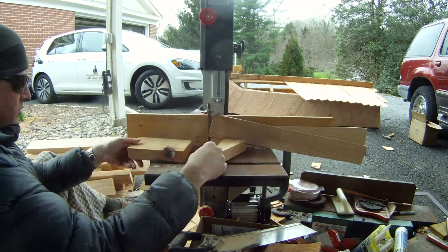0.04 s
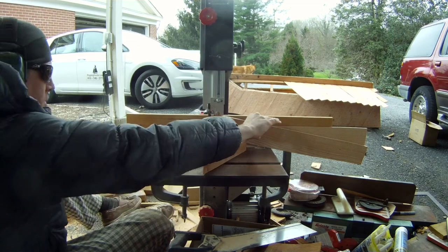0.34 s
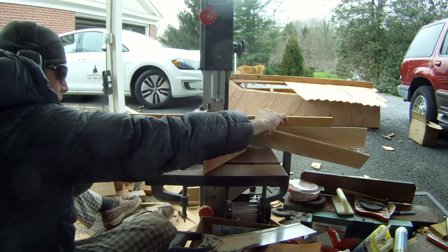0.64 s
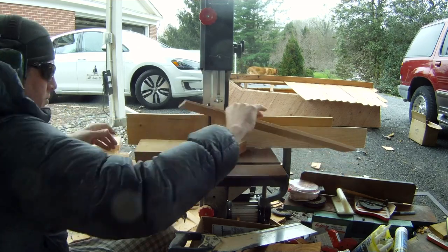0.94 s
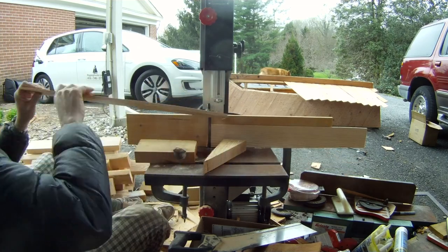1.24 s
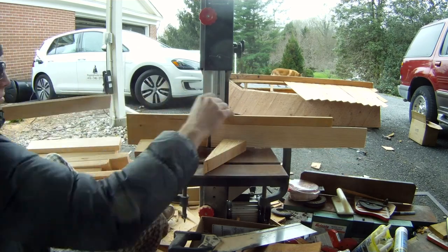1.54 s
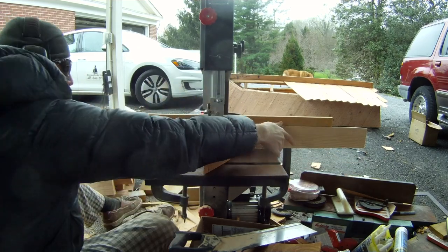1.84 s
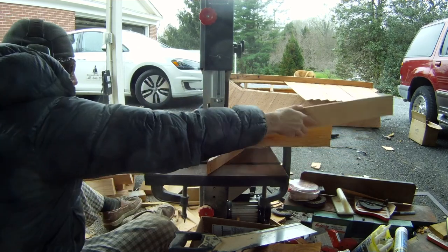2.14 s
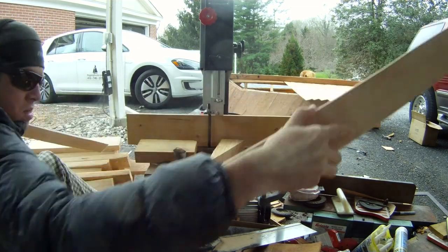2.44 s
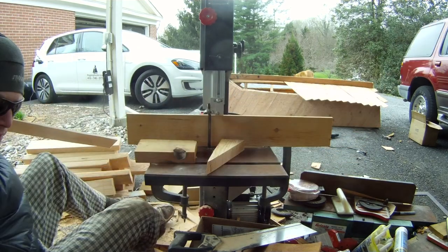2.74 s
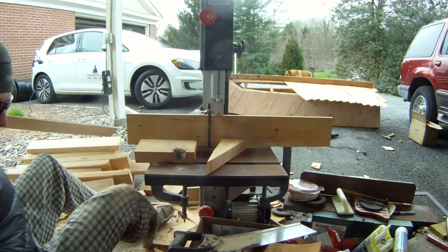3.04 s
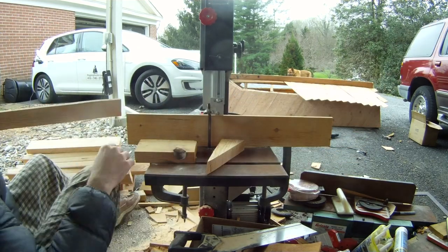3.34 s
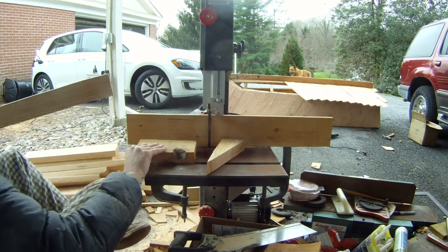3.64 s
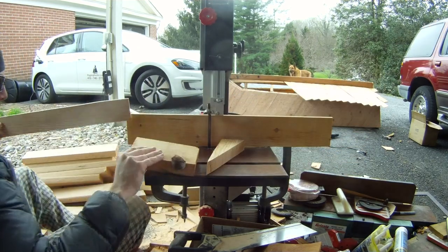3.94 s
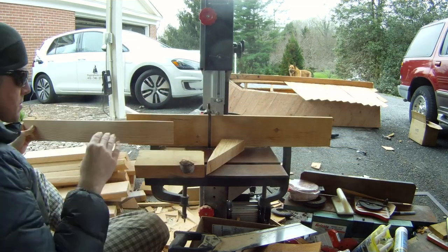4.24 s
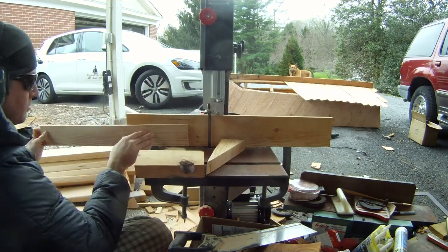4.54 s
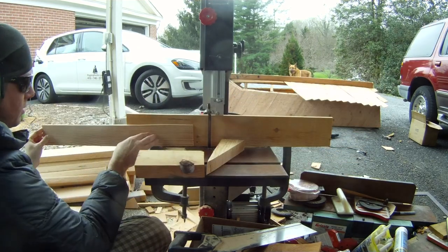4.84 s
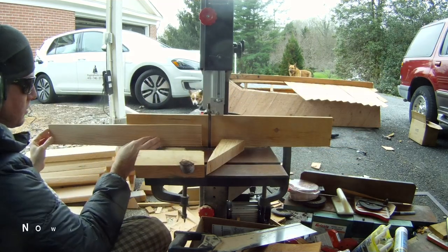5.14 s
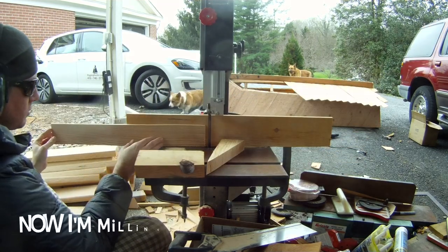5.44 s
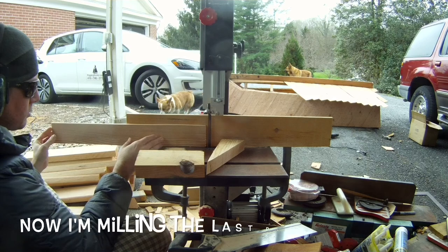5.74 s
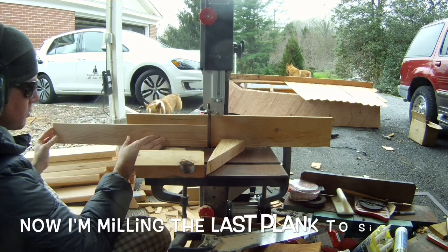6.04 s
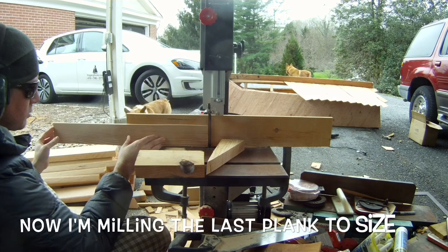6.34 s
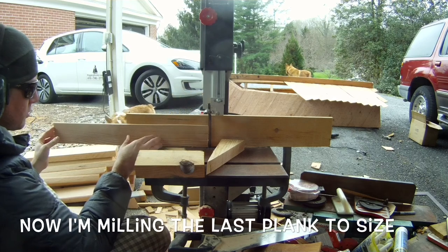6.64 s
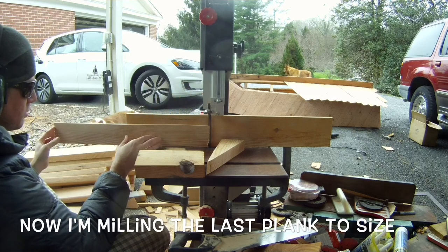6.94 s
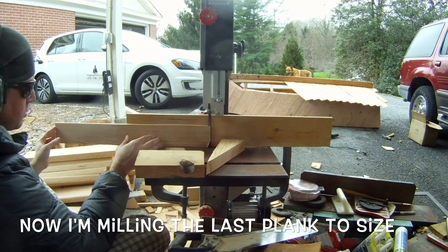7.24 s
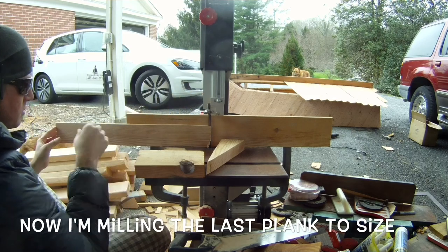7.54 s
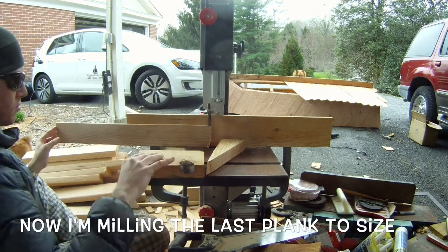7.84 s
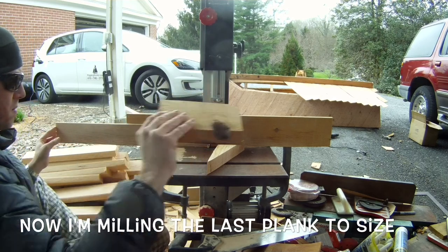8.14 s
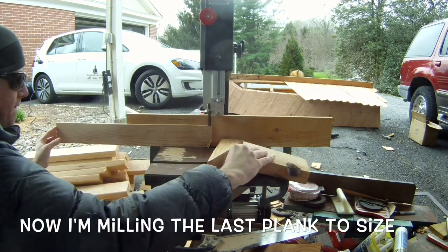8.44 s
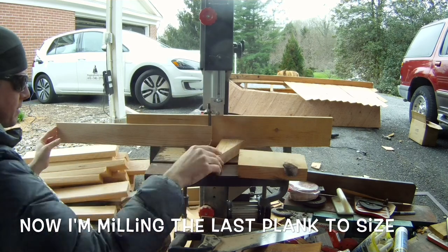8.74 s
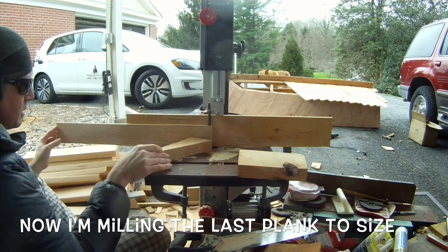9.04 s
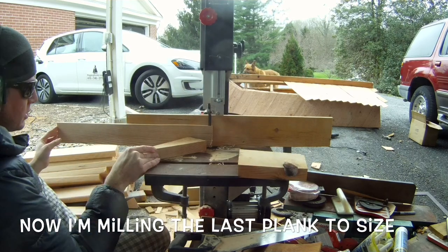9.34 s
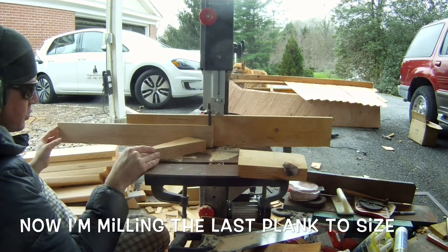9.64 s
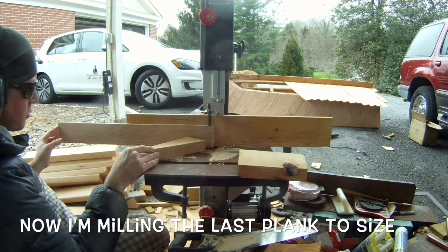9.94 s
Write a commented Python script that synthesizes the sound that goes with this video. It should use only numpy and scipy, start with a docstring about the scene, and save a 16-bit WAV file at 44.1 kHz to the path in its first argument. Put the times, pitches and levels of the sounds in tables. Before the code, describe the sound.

A bandsaw is already cutting a thin wooden plank, close by and outdoors, with a high, fluttering whine over a grainy sawdust hiss. At about 2.4 seconds the cut eases for an instant and the pitch lifts slightly. The blade bites again at 2.7 seconds and the whine sags a little. From about 3.5 to 6 seconds the sawing grows rougher, with rasping near 4 seconds, juddering and scattered small metallic pings as teeth catch. From 6.3 seconds the blade chatters harder and the plank rattles. At about 7.2 seconds the cutting stops and the blade runs free, softer and slightly higher, rubbing in its guides with a thin pulsing ring, a little stronger after 8 seconds. Just after 9 seconds a new rasping cut begins and continues to the end at 10 seconds. A faint motor buzz and low outdoor background lie underneath.

```python
"""A bandsaw rips thin planks outdoors, close by. A harmonic of the tooth rate drives a blade resonance
into a whine, which sags in pitch under load. Stick-slip friction makes the blade chatter in the kerf,
and tearing fibres hiss as sawdust. Twice the cut eases: the blade speeds up and only rubs in its guides.
Underneath, the motor buzzes at the mains frequency over the faint noise of the yard."""
import sys
import numpy as np
from scipy import signal
from scipy.fft import rfft, irfft
from scipy.io import wavfile

SR = 44100
rng = np.random.default_rng(int(sys.argv[2]) if len(sys.argv) > 2 else 0)


def persist_wave(psi):
    """Save psi, clipped to +-1, as 16-bit WAV."""
    counts = np.round(np.clip(psi, -1, 1) * 32767).astype(np.int16)
    wavfile.write(sys.argv[1], SR, np.atleast_2d(counts).T)


N = 441000
TIME = np.arange(N) / SR


# Tooth rate, lower the harder the blade cuts: t/s, f/Hz
TOOTH_RATE = [(0.0, 781.6), (1.21, 782.3), (2.24, 780.6), (2.45, 805.2), (2.63, 807.5), (2.82, 787.6),
              (3.05, 780.7), (3.76, 776.6), (4.15, 771.8), (5.16, 775.1), (5.85, 776.1), (6.16, 778.9),
              (6.38, 791.9), (7.18, 791.9), (7.32, 808.1), (9.04, 809.9), (9.63, 792.7), (9.78, 784.6),
              (10.0, 783.6)]
def blade_motion(free_hz=809, full_sag_hz=37, teeth_per_turn=59.8, jitter_teeth=0.0048, high_spot_s=.05):
    """Load slows the drive: the tooth rate gives tooth phase, wheel turns and, by its sag, the load."""
    tooth_hz, = in_time(TOOTH_RATE)
    load = np.clip((free_hz - tooth_hz) / full_sag_hz, 0, 1)
    teeth_passed = np.cumsum(tooth_hz) / SR
    phase = 2 * np.pi * (teeth_passed + jitter_teeth * drift(31))
    turns = (teeth_passed - high_spot_s * tooth_hz[0]) / teeth_per_turn
    return phase, turns, load


# Swells in which the whine sings out: t/s, half-length/s, level/dB
WHINE_SWELLS = [(1.8, .35, -26), (2.47, .1, -28.5), (2.76, .1, -23.5), (3.15, .2, -29), (7.42, .18, -31.5),
                (9.55, .33, -26.5)]
def blade(phase, turns, load, pressure, clicks, idle_whine_db=-29.7, idle_chatter_db=-31.2):
    """Forced vibration: the blade sounds softly when free, loudly in wood, and rings on after a cut."""
    biting, (whine_gain, chatter_gain, *_) = pushes(release_s=.065)
    whine_gain = from_db(idle_whine_db) + whine_gain + swells(WHINE_SWELLS)
    tone = whine_gain * whine(phase, pressure, biting)
    chatter_gain = from_db(idle_chatter_db) * hard_rub() + chatter_gain
    rattle = chatter_gain * ring(clicks, hz=3970, width_hz=416)
    return tone * throb(turns, depth_db=1.8 * (1 - load)) + rattle * throb(turns, depth_db=.8)


# Frame resonances that tooth harmonics slide through: harmonic number, f/Hz, bandwidth/Hz, gain/dB
FRAME_MODES = [(3, 2405, 24, -22), (8, 6180, 22, -24), (9, 7215, 63, -15.5)]
def whine(phase, pressure, biting, blade_hz=3925, width_hz=150, flutter_db=0.53):
    """Resonance: the fifth tooth harmonic peaks on a blade mode, others on the modes of the frame."""
    frame = sum(from_db(db) * resonate(harmonic(phase, k), hz, width) for k, hz, width, db in FRAME_MODES)
    tone = resonate(harmonic(phase, order=5), blade_hz, width_hz)
    return (tone + biting * frame) * (1 + pressure) * from_db(flutter_db * drift(18))


# Pushes of wood into the blade: start t/s, end t/s, bite time/s, then level/dB of whine and blade
# chatter, and level/dB at full load of kerf chatter, rasp and plank rattle
PUSHES = [(-1, 2.425, .02, -20.9, -27, -24.3, -52, -50),
          (2.65, 6.28, .025, -21.1, -27.8, -19.8, -35.5, -44.5),
          (6.28, 7.22, .02, -24, -23.5, -16.5, -30, -31), (9.12, 11, .1, -22, -26.3, -21, -27.5, -34.5)]
def pushes(release_s):
    """Exponential rise and decay: the envelope of tooth contact, and a gain for each level column."""
    gates = np.array([held(start, end, bite_s, release_s) for start, end, bite_s, *_ in PUSHES])
    return gates.sum(axis=0), from_db(np.transpose(PUSHES)[3:]) @ gates


# Fourier components of the blade pressure: cycles per wheel turn, relative amplitude
PRESSURE_HARMONICS = [(2, 0.1), (3, 0.08), (4, 0.08), (5, 0.2), (6, 0.1), (11, 0.14), (12, 0.14),
                      (13, 0.31), (14, 0.13), (16, .1)]
def wheel_pressure(turns):
    """Periodic forcing: the same uneven pressure comes round with every wheel turn; mean 0."""
    angle = np.linspace(0, 2 * np.pi, 1024)
    pattern = sum(depth * np.cos(cycles * angle + rng.uniform(0, 2 * np.pi))
                  for cycles, depth in PRESSURE_HARMONICS)
    return np.interp(turns % 1, angle / (2 * np.pi), pattern)


def slips(pressure, per_s=215, unevenness=.3, spread_db=1.0):
    """Stick-slip friction: the blade catches and lets go in uneven jerks, harder at pressure peaks."""
    gaps_s = np.exp(unevenness * rng.standard_normal(4000)) / per_s
    at = (np.cumsum(gaps_s) * SR).astype(int)
    at = at[at < N]
    clicks = np.zeros(N)
    clicks[at] = from_db(spread_db * np.clip(rng.standard_normal(N)[at], -2, 2))
    return clicks * (1 + pressure) + 1e-18


# The blade binds and tears harder: t/s, half-length/s, rasp level/dB
BINDING_SWELLS = [(3.98, .42, -33), (4.9, .5, -39.5)]
# The blade judders in the kerf: t/s, half-length/s, level/dB
JUDDER_SWELLS = [(4.7, .25, -25.5), (5.6, .25, -27), (6.12, .17, -21.5)]
def cutting(phase, turns, load, pressure, clicks, binding_dust_db=-8):
    """Contact excitation: teeth in wood sound louder with load, each push with its own balance."""
    in_wood, (_, _, kerf, wedged, plank) = pushes(release_s=.03)
    binding = swells(BINDING_SWELLS)
    dust_gain = in_wood * loaded(load, full_db=-28.4, fall_db=5.2) + from_db(binding_dust_db) * binding
    kerf_gain = kerf * loaded(load, fall_db=21) + swells(JUDDER_SWELLS)
    out = dust_gain * sawdust(clicks, turns)
    out += kerf_gain * ring(clicks, hz=3690, width_hz=200)
    out += (wedged * loaded(load, fall_db=19) + binding) * rasp(clicks)
    out += squeal(phase, pressure, in_wood * loaded(load, fall_db=5))
    return out + table_and_plank(turns, in_wood, plank * loaded(load, fall_db=14))


# Spectrum of tearing fibres: f/Hz, relative level/dB
TEARING_SPECTRUM = [(300, -32), (1100, -22), (1800, -26.5), (2050, -9), (2400, -14), (2800, 3.8),
                    (3400, -4.3), (4500, -3), (6200, -5.5), (7000, -2.5), (7700, -2.5), (9300, -9.5),
                    (11000, -10), (12000, -21)]
# Modes of the blade held in the kerf: f/Hz, bandwidth/Hz, relative level/dB
HELD_BLADE_MODES = [(2541, 38, 3.5), (2682, 135, -2.5), (3002, 180, 2), (3325, 140, -0.5),
                    (4685, 130, -1.5), (5053, 54, 3), (5260, 43, -1.5), (5643, 214, -2), (6893, 185, 1),
                    (7060, 213, 2), (7930, 37, 3.5), (8620, 340, -8.5)]
def sawdust(clicks, turns, grain_db=2.04, surge_db=1.26, tick_db=-7, modes_db=-0.4):
    """Broadband excitation: fibres tear in a grainy hiss that rings the blade, with a tick per slip."""
    ticks = from_db(tick_db) * rms_one(clicks)
    grains = rng.standard_normal(N) * from_db(grain_db * drift(170))
    tearing = coloured(grains + ticks, TEARING_SPECTRUM)
    ringing = from_db(modes_db) * body(rng.standard_normal(N) + ticks, HELD_BLADE_MODES)
    surge = from_db(surge_db * drift(30)) * throb(turns, depth_db=1.03)
    return rms_one((tearing + ringing) * surge)


# Modes of the tightly wedged blade: f/Hz, bandwidth/Hz, relative level/dB
WEDGED_BLADE_MODES = [(2270, 37, -3), (2515, 32, 5), (6210, 45, -3), (6846, 180, 5.5), (7106, 230, 1)]
def rasp(clicks, grain_db=-2):
    """Frictional excitation: slips and rubbing teeth ring the wedged blade."""
    friction = rms_one(clicks) + from_db(grain_db) * rng.standard_normal(N)
    return body(friction, WEDGED_BLADE_MODES)


# Partials of the squeal: harmonic number, relative level/dB
SQUEAL_PARTIALS = [(1, -21), (4, 1), (8, -3.5), (12, 0.5), (13, 3)]
# Flares of the squeal: t/s, half-length/s, level/dB
SQUEAL_SWELLS = [(1.6, .65, -48), (3.98, .3, -47.5), (4.8, .25, -54), (5.75, .4, -50)]
# Whistles an octave above the whine: t/s, half-length/s, level/dB
WHISTLE_SWELLS = [(1.05, .65, -39.5), (2.72, .14, -39), (9.42, .14, -44)]
def squeal(phase, pressure, biting, whistle_db=-47, squeal_db=-50.3, rough_db=2.5, pressure_share=0.54):
    """Harmonic series: further multiples of the tooth rate sound as the teeth bite, and flare at times."""
    whistle_gain = from_db(whistle_db) * biting + swells(WHISTLE_SWELLS)
    squeal_gain = from_db(squeal_db) * biting + swells(SQUEAL_SWELLS)
    out = whistle_gain * harmonic(phase, order=10) * (1 + pressure_share * pressure)
    for order, db in SQUEAL_PARTIALS:
        out += squeal_gain * from_db(db + rough_db * drift(30)) * harmonic(phase, order)
    return out


# Hard catches of a tooth: t/s, relative level/dB
TOOTH_CATCHES = [(3.4451, -5), (3.5094, -6), (5.0489, -2), (5.2385, -4), (5.434, -5), (5.5034, -6),
                 (5.6724, -4), (5.9319, -4), (7.0703, -3), (9.3057, -8), (9.9373, -4)]
def snags(gain_db=-2.3):
    """Impulse response: a tooth catches hard and the blade gives one loud ping."""
    times, db = np.transpose(TOOTH_CATCHES)
    impulses = np.full(N, 1e-18)
    impulses[(times * SR).astype(int)] = from_db(db)
    pings = ring(impulses, hz=3860, width_hz=420)
    return from_db(gain_db + db.max()) * pings / np.abs(pings).max()


# Moments when the feed falters: t/s, level change/dB
FEED_DIPS = [(3.08, -4.5), (3.43, -3), (3.535, -2.5), (5.255, -6)]
def feed(half_width_s=0.01):
    """Amplitude modulation: the gain of the sawing drops for an instant when the feed falters."""
    return from_db(sum(db / (1 + ((TIME - t) / half_width_s) ** 2) for t, db in FEED_DIPS))


# Modes of the plank being cut: f/Hz, bandwidth/Hz, relative level/dB
WOOD_MODES = [(1080, 99, -19), (1290, 46, -15), (2012, 32, -7), (2117, 72, -0.5), (2298, 67, 1),
              (2537, 67, 1), (2650, 104, -10.5)]
# Brief moans of the cast saw table: t/s, half-length/s, level/dB
TABLE_SWELLS = [(.64, .25, -57), (6.08, .08, -55)]
def table_and_plank(turns, in_wood, plank_gain, table_db=-65):
    """Structure-borne sound: the cut shakes the saw table and the plank, swelling once a wheel turn."""
    table_gain = from_db(table_db) * in_wood + swells(TABLE_SWELLS)
    shake = rng.standard_normal(N) * throb(turns, depth_db=3)
    return table_gain * ring(shake, hz=477, width_hz=9.4) + plank_gain * body(shake, WOOD_MODES)


# Modes of blade and guides under steady rubbing: f/Hz, bandwidth/Hz, relative level/dB
RUBBED_MODES = [(2112, 58, -7), (2485, 39, 2.5), (2610, 88, -2), (3000, 98, -14), (3544, 85, -3.5),
                (4350, 44, 4), (4960, 140, -6.5), (5280, 34, -8), (5660, 190, -11), (6827, 230, -3),
                (7100, 180, -3.5), (7890, 240, -12.5), (10000, 25, -11)]
# Spectrum of the rubbing hiss: f/Hz, relative level/dB
FRICTION_SPECTRUM = [(1700, -36), (2050, -6), (3200, -4), (4500, 1.5), (6100, -3), (7200, -7), (8600, -6),
                     (10700, -7), (12000, -22)]
def guides(turns, grain_db=1.5, hiss_db=-3.8):
    """Sliding friction: the running blade rubs its guides and keeps their resonances ringing."""
    rub = rng.standard_normal(N) * from_db(grain_db * drift(59)) * throb(turns, depth_db=.9)
    hiss = coloured(rng.standard_normal(N), FRICTION_SPECTRUM)
    return body(rub, RUBBED_MODES) + from_db(hiss_db) * hiss


def hard_rub(start_s=8.05, end_s=9.1, rise_db=4.1):
    """Friction grows with normal force: gain as the plank brushes the running blade before the last cut."""
    return from_db(rise_db * held(start_s, end_s, attack_s=.2, release_s=.15))


# Tones of a guide bearing: f/Hz, relative level/dB
BEARING_TONES = [(5018, 0), (6785, -8)]
def bearing(turns, throb_db=11, spread_db=1.5, wander_rad=1.3):
    """Periodic loading: a wavering bearing swells as the wheel's high spot presses the blade on it."""
    press = from_db(throb_db * np.cos(np.pi * turns) ** 4 + spread_db * drift(18))
    tones = sum(from_db(db) * np.sin(2 * np.pi * hz * TIME + wander_rad * drift(25))
                for hz, db in BEARING_TONES)
    return rms_one(tones * press)


def motor(mains_hz=59.96, push=0.0089, pull=0.017, lead_s=0.00347, half_width_s=0.00028, shake_db=1.9):
    """Pulse-train excitation: each mains cycle jolts the motor with a push, then a stronger pull."""
    def jolt(delay_s):
        cycles_since = ((TIME - delay_s) * mains_hz + .5) % 1 - .5
        return 1 / (1 + (cycles_since / mains_hz / half_width_s) ** 2)
    buzz = (push * jolt(-lead_s) - pull * jolt(0)) * from_db(shake_db * drift(28))
    # a small housing radiates little bass
    return signal.sosfilt(signal.butter(2, 85, "high", fs=SR, output="sos"), buzz)


# Spectrum of the outdoor background: f/Hz, relative level/dB
YARD_SPECTRUM = [(20, -17), (60, -9), (150, 8), (250, -1.5), (350, 4.5), (600, -1.5), (1100, 0.5),
                 (1700, -6.5), (4000, -10.5), (11000, -28)]
def yard(level_db=-53.5):
    """Stationary noise: a faint, low outdoor background."""
    return from_db(level_db) * coloured(rng.standard_normal(N), YARD_SPECTRUM)


def from_db(db):
    """Amplitude ratio of a level in decibels."""
    return 10 ** (np.asarray(db) / 20)


def rms_one(x):
    """Normalisation to rms 1."""
    return x / np.sqrt(np.mean(x ** 2) + 1e-20)


def in_time(rows):
    """Linear interpolation of each column of a curve at every sample."""
    times, *columns = np.transpose(rows)
    return [np.interp(TIME, times, column) for column in columns]


def coloured(x, spectrum):
    """Spectral shaping by a level curve over log frequency; rms 1."""
    hz, db = np.transpose(spectrum)
    bin_hz = np.arange(N // 2 + 1) * SR / N
    gain = from_db(np.interp(np.log(bin_hz + 1e-3), np.log(hz), db))
    return rms_one(irfft(rfft(x) * gain, N))


def drift(rate_hz):
    """Low-pass noise: a smooth random fluctuation of rms 1, mostly below rate_hz."""
    pole = np.exp(-40 * np.pi * rate_hz / SR)  # one step per 20 samples
    slow = signal.lfilter([1], [1, -2 * pole, pole * pole], rng.standard_normal(N // 20 + 2002))[2000:]
    return np.interp(np.arange(N) / 20, np.arange(len(slow)), rms_one(slow))


def harmonic(phase, order):
    """One sinusoidal harmonic of the tooth rate; rms 1."""
    return np.sqrt(2) * np.sin(order * phase)


def resonate(x, hz, width_hz):
    """Damped oscillator: one resonance with gain 1 at its peak."""
    r = np.exp(-np.pi * width_hz / SR)
    feedback = [1, -2 * r * np.cos(2 * np.pi * hz / SR), r * r]
    return signal.lfilter(np.array([1, 0, -1]) * (1 - r * r) / 2, feedback, x)


def ring(x, hz, width_hz):
    """Three resonators in cascade, each width_hz wide, make one steep-sided peak; rms 1."""
    for _ in range(3):
        x = resonate(x, hz, width_hz)
    return rms_one(x)


def body(x, modes):
    """Modal superposition: each mode is two cascaded resonators of 1.22 times its bandwidth; rms 1."""
    return rms_one(sum(from_db(db) * resonate(resonate(x, hz, 1.22 * width), hz, 1.22 * width)
                       for hz, width, db in modes))


def held(start, end, attack_s, release_s):
    """Exponential envelope that rises from start, holds, and decays after end."""
    rise = 1 - np.exp(-np.maximum(TIME - start, 0) / attack_s)
    return rise * np.exp(-np.maximum(TIME - end, 0) / release_s)


def swells(rows):
    """Gain as a sum of Gaussian swells."""
    return sum(from_db(db) * np.exp(-((TIME - t) / half_s) ** 2) for t, half_s, db in rows)


def loaded(load, fall_db, full_db=0):
    """Gain linear in decibels: full_db at full load and fall_db less at none."""
    return from_db(full_db - fall_db * (1 - load))


def throb(turns, depth_db):
    """Amplitude modulation: a gain that swells once a wheel turn."""
    return from_db(depth_db * np.cos(2 * np.pi * turns))


def scene():
    """Superposition of all sources; the load drives the cut and damps the guides and bearing."""
    phase, turns, load = blade_motion()
    pressure = wheel_pressure(turns)
    clicks = slips(pressure)
    saw = blade(phase, turns, load, pressure, clicks) + cutting(phase, turns, load, pressure, clicks)
    running = loaded(load, full_db=-37.5, fall_db=-1.7) * hard_rub() * guides(turns)
    running += loaded(load, full_db=-55, fall_db=-16.5) * bearing(turns)
    return (saw * feed() + snags() + running + yard() + motor())[None]


def record(dry, rate_hz=24000, image_db=-1.5, image_edge_hz=9000, cutoff_hz=15750):
    """Spectral imaging: a low sampling rate mirrors the treble about half that rate; the top is cut."""
    treble = signal.sosfilt(signal.butter(4, image_edge_hz, "high", fs=SR, output="sos"), dry)
    image = np.real(signal.hilbert(treble) * np.exp(-2j * np.pi * rate_hz * TIME))
    low_pass = signal.ellip(12, .1, 90, cutoff_hz, fs=SR, output="sos")
    return signal.sosfilt(low_pass, dry + from_db(image_db) * image)


dry = scene()
out = record(dry)
persist_wave(out)
```